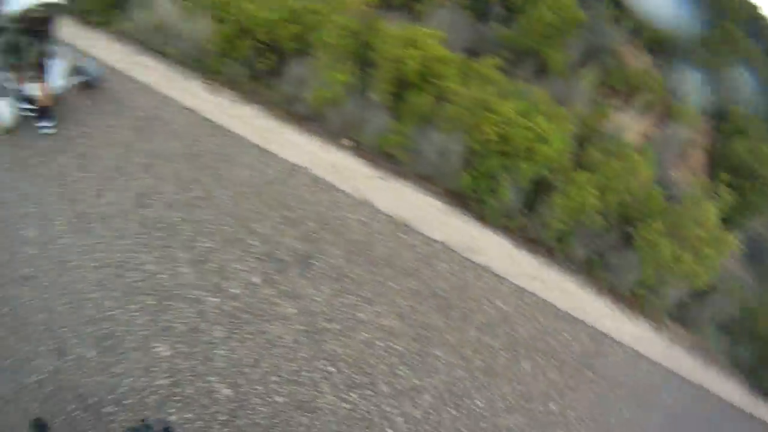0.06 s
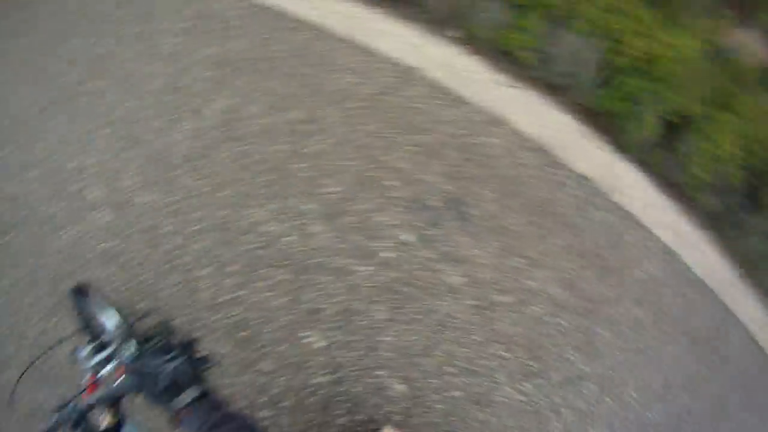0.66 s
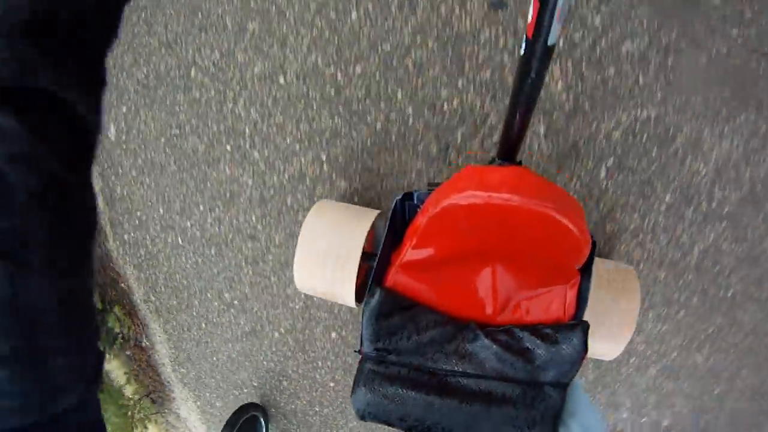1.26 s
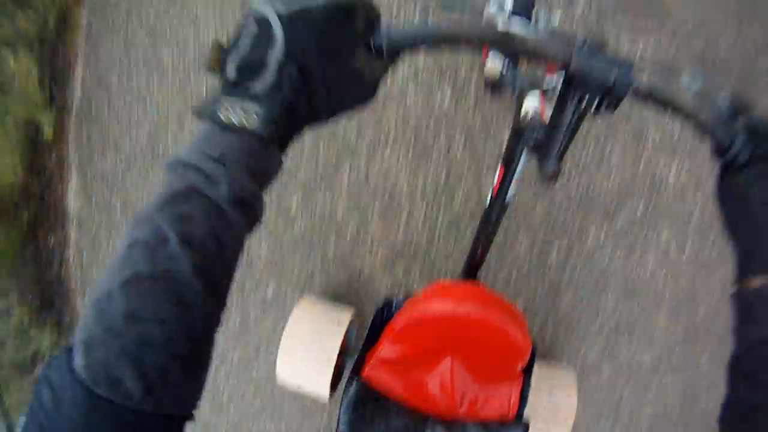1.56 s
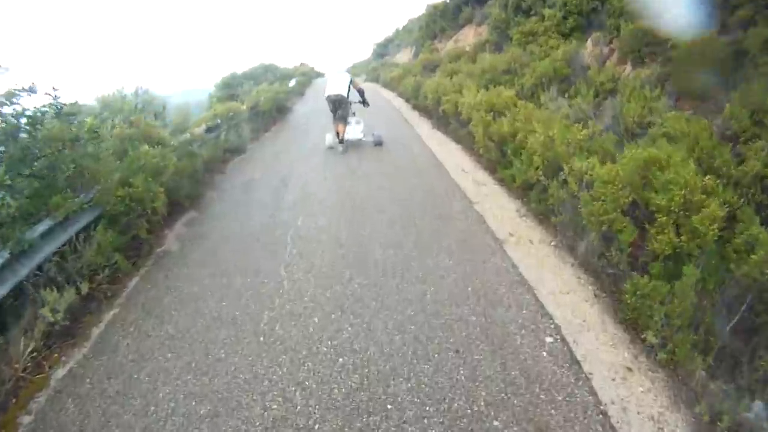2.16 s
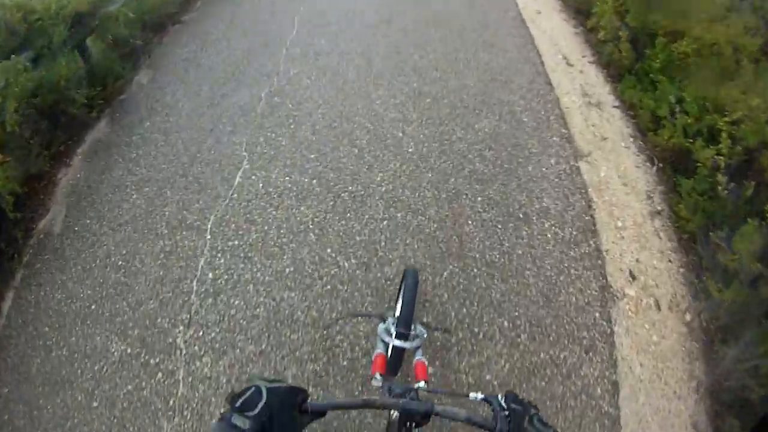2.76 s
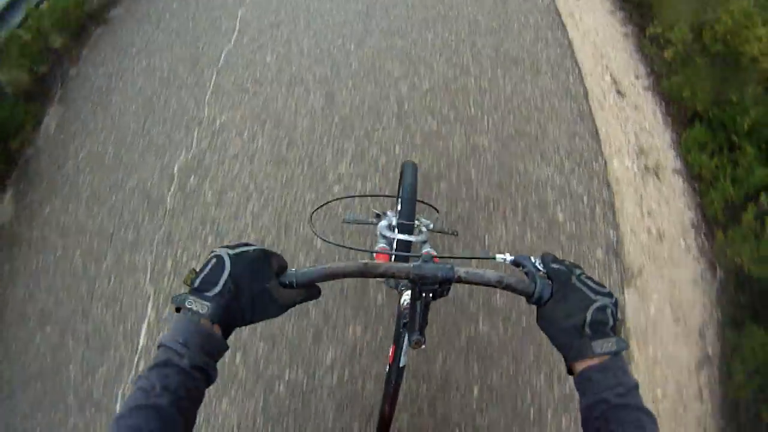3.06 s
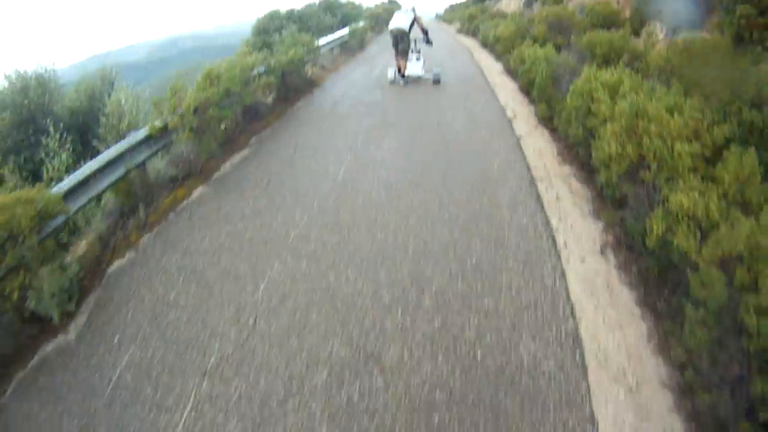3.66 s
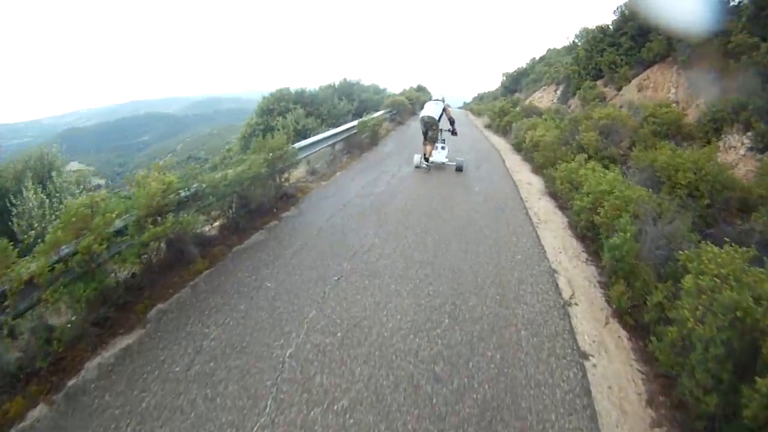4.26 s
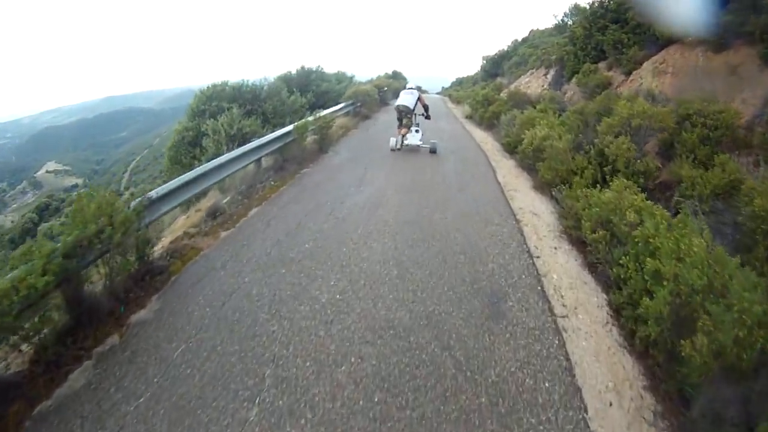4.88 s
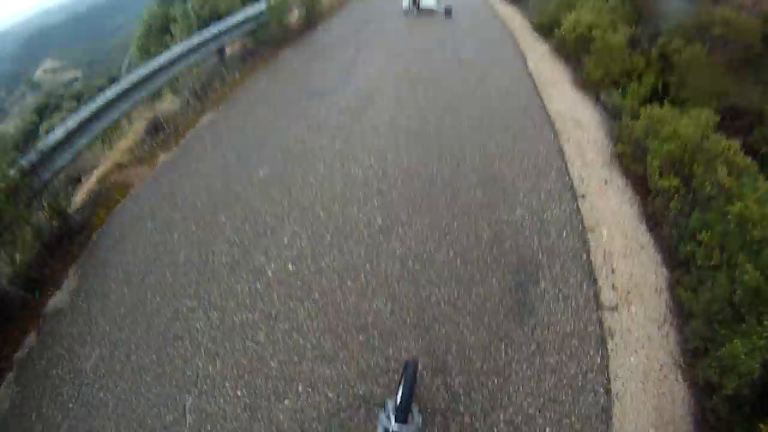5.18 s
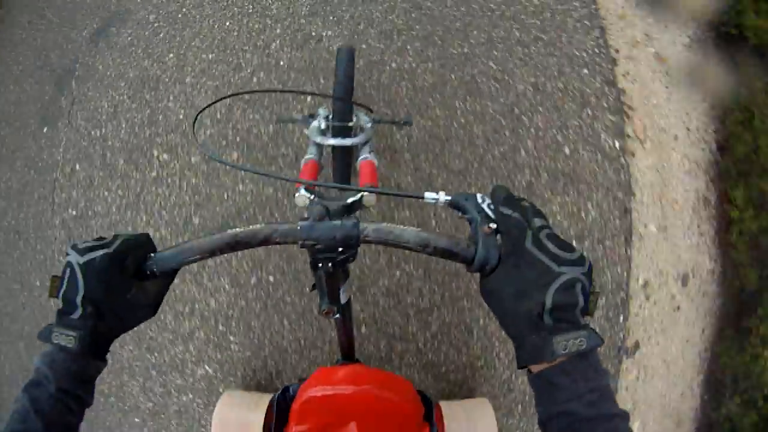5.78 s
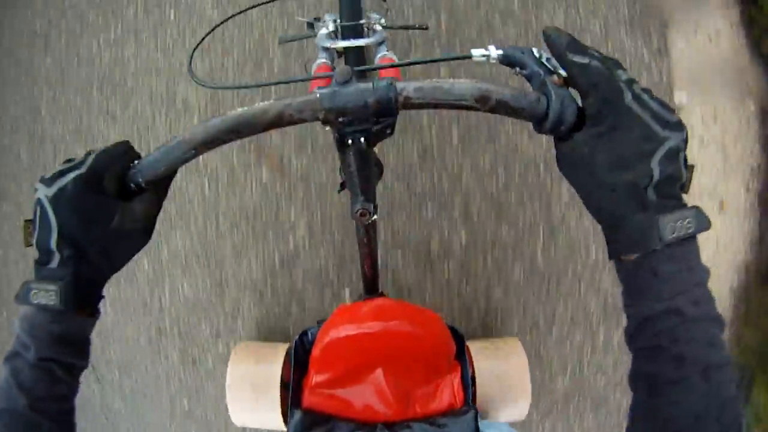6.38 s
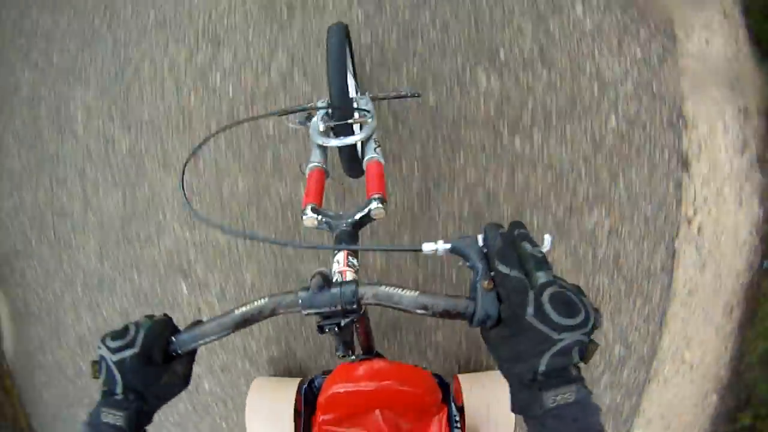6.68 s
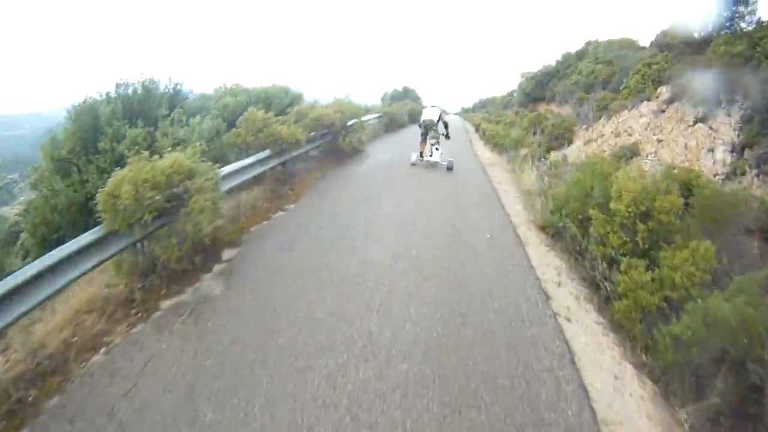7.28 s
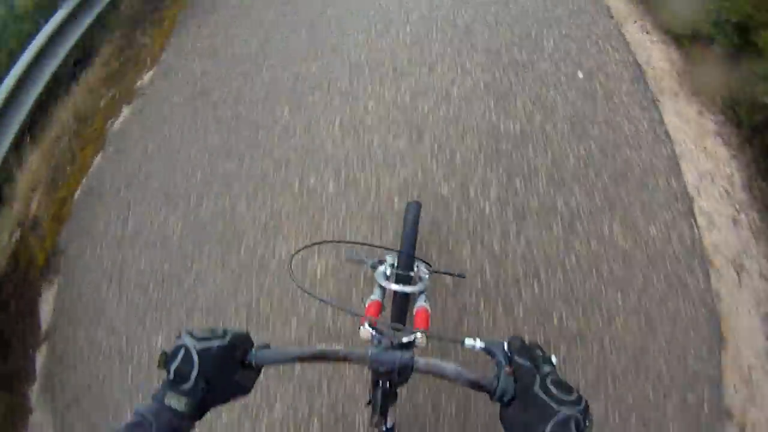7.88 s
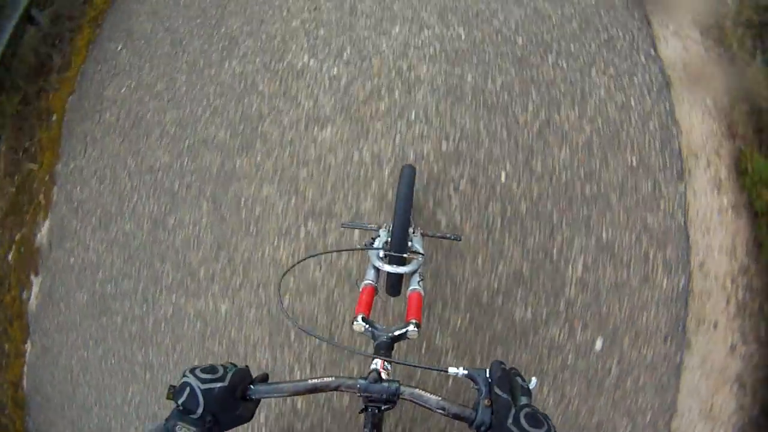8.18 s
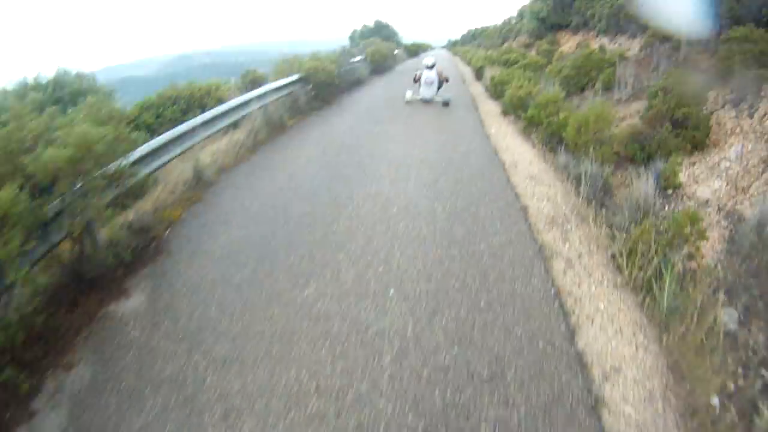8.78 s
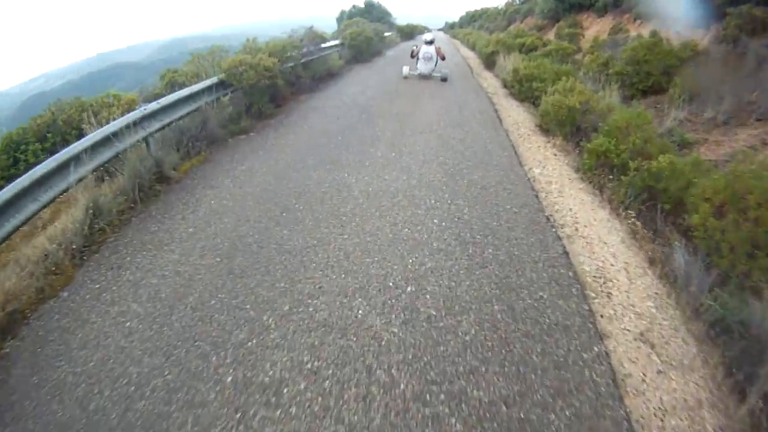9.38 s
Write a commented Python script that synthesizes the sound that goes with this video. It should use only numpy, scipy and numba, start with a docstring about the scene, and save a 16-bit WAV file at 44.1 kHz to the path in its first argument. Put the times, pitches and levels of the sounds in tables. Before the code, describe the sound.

Plastic trike wheels roar over rough asphalt with crackling grit, wind rumble, rattling ticks and a few heavy thumps from bumps.

```python
"""A drift trike rolls down rough asphalt, heard from a camera in a hard case on the rider's helmet.
From the start, plastic wheels roar and grit crackles through the case's resonances; wind rumbles and
the mount ticks. Near 2 s two heavy bumps make the mount boom, and the gain control ducks after each.
The roar swells with speed and changes colour as the head moves, until near 7.8 s the hardest jolt
cracks and overloads the microphone. Throughout, coarse sampling adds a glassy fizz."""
import sys
import numpy as np
from scipy import signal
from scipy.fft import rfft, irfft
from scipy.io import wavfile
from scipy.ndimage import uniform_filter1d
from numba import njit

SR = 44100
rng = np.random.default_rng(int(sys.argv[2]) if len(sys.argv) > 2 else 0)


def output_pcm(signal):
    """Save a mono or channel-first signal as 16-bit PCM at the path in sys.argv[1].

    Samples are clipped to [-1, 1] before scaling.
    """
    pcm = np.clip(np.atleast_2d(signal).T, -1, 1) * 32767
    wavfile.write(sys.argv[1], SR, np.round(pcm).astype(np.int16))


N = 420713
TIME = np.arange(N) / SR
HZ = np.fft.rfftfreq(4096, 1 / SR)

# Wind on the case, patches of loose grit, and the wheels' roar. Each row: time in seconds, level in dB.
WIND_LEVEL = [(0, -50), (.6, -42), (1.0, -49.5), (1.3, -37), (1.55, -50), (1.85, -33), (2.15, -52.5),
              (2.5, -37), (2.8, -53.5), (3.2, -42.5), (3.5, -52.5), (4.0, -44.5), (5.0, -50.5), (5.7, -40),
              (6.15, -53), (6.55, -44), (7.3, -41.5), (7.65, -49.5), (7.92, -36.5), (8.35, -52.5),
              (8.7, -45.5), (9.05, -51.5), (9.54, -47)]
GRIT_LEVEL = [(0, -47), (.2, -50.5), (.6, -45.5), (.8, -48.5), (1.15, -45.5), (2.05, -47), (2.8, -52.5),
              (3.2, -48.5), (4.6, -53), (5.6, -47.5), (6.1, -49), (6.55, -45), (7.25, -52), (7.95, -50),
              (8.6, -58), (9.54, -56.5)]
ROAR_LEVEL = [(0, -44), (.3, -46.5), (.8, -45), (1.45, -41.5), (2.05, -43), (2.8, -45), (3.15, -41.5),
              (5.0, -41), (5.5, -39.5), (6.1, -39.5), (6.75, -37), (7.45, -41), (8.1, -39), (8.65, -40),
              (9.3, -37), (9.54, -40)]
# Unevenness of the wheels' bite. Each row: time in seconds, depth in dB before each layer's scaling.
FLUTTER_DEPTH = [(0, 3.5), (3, 2), (6.8, 3.5), (9.54, 1.6)]
# Spectra of wind, slipping mount, hollow knock, wheel drone and grit.
# Each row: frequency in Hz, relative level in dB.
WIND_SPECTRUM = [(10, -4), (26, 3.5), (52, -3.5), (80, -3), (105, -17.5), (160, -19), (300, -35),
                 (700, -54)]
SCUFF_SPECTRUM = [(60, 3), (190, -1), (300, -6), (500, -10.5), (770, -5), (1150, 2.5), (1400, -3.5),
                  (2100, 6), (2800, -10), (4000, -15.5), (6000, -18)]
KNOCK_SPECTRUM = [(60, -8), (150, 2.5), (230, -6.5), (340, -15.5), (560, -20), (770, -6), (1000, -19),
                  (2000, -32), (5000, -46)]
DRONE_SPECTRUM = [(100, -24.5), (190, -10), (255, 2), (340, -2.5), (450, -2), (600, -7.5), (900, -24),
                  (2000, -50)]
GRIT_SPECTRUM = [(300, -12), (900, -14), (2200, -6.5), (3200, 0.5), (5000, 3.5), (6000, 15)]
# Resonances of the case. Each row: centre in Hz, half-width in Hz, relative gain in dB.
CASE_RESONANCES = [(760, 51, -11.5), (1025, 102, -11.5), (1198, 116, -2.5), (1542, 185, -4.5),
                   (2022, 256, -1), (2247, 190, -1), (2830, 560, -3), (3485, 526, -3.5), (5135, 930, -14.5)]
# Modes rung by the crack. Each row: frequency in Hz, relative level in dB, 60 dB decay time in seconds.
CRACK_MODES = [(980, -19, 0.023), (1122, -12, 0.019), (1240, -13.5, 0.018), (1594, -9, 0.015),
               (1992, 2.5, 0.012), (2340, -5.5, 0.014), (2910, -9, 0.012), (3430, -27, 0.0038),
               (5000, -4, 0.0032)]
# The flexing case wall: frequency in Hz, level against the swing in dB, 60 dB decay time in seconds.
WALL_MODE = (229, -21.5, 0.1)
# Slips of the mount. Each row: start in seconds, length in seconds, level in dB.
SCUFFS = [(.655, 0.091, -39), (1.856, 0.068, -28.5), (2.323, 0.014, -35.5), (2.337, .024, -29)]
# The mount's loudest ticks. Each row: start in seconds, level at the loudest in dB,
# dull part and sharp part in dB against the main note.
TICKS = [(.112, -33.5, -3, -11), (.189, -29.5, -17, -10), (.398, -24, -5, -15), (.541, -30, -29, -22),
         (1.115, -29, -21, -25), (1.343, -29.5, -12, -8), (1.46, -27, -17, -5), (1.476, -27, -20, -8),
         (1.509, -22.5, -27, -6), (1.868, -30, -4, -19), (1.967, -21, 7, -14), (2.049, -28.5, -20, -13),
         (2.08, -28, -28, -11), (2.107, -28.5, -22, -10), (2.146, -27.5, -27, -25), (2.498, -25, -12, -13),
         (2.594, -27, -6, -20), (2.749, -21, -23, -15), (3.194, -26.5, -10, -12), (3.24, -27, -20, -10.5),
         (3.314, -20.5, 10, -9), (4.22, -24, -26, -26), (4.283, -25, -20, -20), (4.392, -26.5, -6, -14),
         (4.681, -29.5, -9, -10), (4.7, -27.5, -3, -20), (4.788, -34.5, -19, -3), (4.87, -19, -28, -21),
         (4.941, -28, -21, -15), (5.295, -26.5, -14, -13), (5.653, -26.5, -7.5, -8.5),
         (5.708, -25, -19, -8), (5.856, -22.5, -26, -18), (6.007, -22, -35, -11), (6.122, -23.5, -22, -11),
         (6.479, -26, -25, -11), (6.633, -32, -16, 2), (6.769, -27, -28, -9), (6.841, -23, -28, -7),
         (6.862, -27, -25, -13), (7.048, -28.5, -22, -9), (7.525, -25.5, -25, -32),
         (7.554, -24.5, -19, -17), (7.901, -24, -18, -11.5), (7.933, -26.5, -4, -18),
         (8.564, -29, -25, -14)]
# Road bumps. Each row: start in seconds, swing level in dB, swing frequency in Hz, knock level in dB.
BUMPS = [(1.222, -24.5, 88, -36.5), (1.715, -27.5, 70.4, -51), (1.856, -24, 65.4, -33),
         (1.895, 1, 64.5, -31), (1.967, -24, 110, -30), (2.323, -24, 70, -29), (2.351, 4.5, 79, -28),
         (3.13, -28, 59.5, -49), (3.311, -31.5, 81, -34), (5.149, -31.5, 78.4, -34.5),
         (5.315, -25, 59, -46), (5.359, -16, 86, -31.5), (5.393, -16.5, 116, -39),
         (5.616, -23.5, 79, -32.5), (6.443, -21, 40.2, -52), (6.475, -19.5, 75.6, -44),
         (7.155, -21.5, 56.4, -47), (7.773, 5, 78.3, -27), (7.932, -16.5, 85, -28.5),
         (8.138, -30.5, 91, -44)]
# The case snapping against its mount: start in seconds, level in dB.
HARDEST_JOLT = (7.7584, 8.5)
# Tilt of the head. Each row: time in seconds, pose from 0 (looking down) to 1 (looking ahead).
HEAD_TILT = [(0, 0), (1.7, 0.1), (1.98, 0.85), (2.25, 0.87), (2.55, 0), (2.9, 0), (3.5, 0.37), (3.85, 0.88),
             (5.15, 1), (5.4, 0.035), (6.98, 0), (7.2, 0.93), (7.6, 1), (7.82, 0.046), (8.62, 0),
             (8.85, 0.97), (9.54, 0.91)]
# Turn of the head. Each row: time in seconds, share of the roadside pose from 0 to 1.
HEAD_TURN = [(0, 0.94), (.58, 0.93), (.85, 0.33)]
# Peaks and dips from helmet and shoulder echoes in each pose.
# Each row: centre in Hz, half-width in Hz, gain in dB.
POSE_AHEAD = [(980, 125, 9), (1250, 140, -2.5), (2180, 180, 4), (2590, 74, 5), (2930, 150, -2.5),
              (3470, 130, -11.5), (3800, 200, 5), (5200, 190, -3)]
POSE_DOWN = [(920, 110, 1), (1230, 71, 1.5), (1740, 150, 1.5), (2120, 71, -4), (2600, 75, -2),
             (2900, 210, 2.5), (3140, 150, 0.5), (4100, 330, -14.5), (4980, 710, 5.5)]
POSE_ASIDE = [(1700, 280, -2.5), (2210, 89, -3), (2430, 95, 6), (2830, 160, -5), (3580, 430, 2.5),
              (4310, 75, 4), (4800, 150, 2.5)]

DRONE_BELOW_ROAR_DB, PEBBLES_BELOW_GRIT_DB = 19.5, 7.5
TICK_HZ, DULL_TICK_HZ = 2230, 1830  # the larger a tick's dull part, the lower its note
CHATTER_RISE_S, CHATTER_T60_S, PING_RISE_S, PING_DB = .001, .019, .0018, -7
RATTLES_PER_S, RATTLE_OVER_GRIT_DB, RATTLE_SPREAD_DB = 4, 14.5, 5.5
SWING_CYCLES = 13.2  # cycles in which a swing dies by 60 dB
LIMIT_DB, FALL_DB_PER_S, HOLD_S, RECOVERY_DB_PER_S = -15.5, 810, .029, 170
CONVERTER_HZ, INPUT_CUTOFF_HZ, OUTPUT_CUTOFF_HZ = 12000, 6050, 15600


def gain_of(db):
    """Amplitude grows tenfold for every 20 dB."""
    return 10 ** (np.asarray(db) / 20)


def unit_rms(x):
    """Normalisation brings the mean power to 1."""
    return x / np.sqrt(np.mean(x ** 2) + 1e-20)


def curve(rows):
    """Linear interpolation gives a timed table's value at every sample."""
    return np.interp(TIME, *np.transpose(rows))


def spectrum(points):
    """Interpolation in dB over log frequency gives a smooth gain curve."""
    hz, db = np.transpose(points)
    return gain_of(np.interp(np.log(HZ + 1), np.log(hz), db))


def resonance(hz, width):
    """A Lorentzian peak falls to half its gain at one width from the centre."""
    return 1 / (1 + ((HZ - hz) / width) ** 2)


def case_response():
    """The resonances of the case add in power."""
    return np.sqrt(sum((gain_of(db) * resonance(hz, width)) ** 2 for hz, width, db in CASE_RESONANCES))


def coloured(x, gain):
    """A minimum-phase filter rings after each click, never before; the result has rms 1."""
    log_gain = np.log(np.maximum(np.r_[gain, gain[-2:0:-1]], 1e-5))
    response = np.exp(np.conj(signal.hilbert(log_gain)))
    taps = irfft(response[:len(gain)])
    return unit_rms(signal.oaconvolve(x, taps)[:len(x)])


def wander(low_hz, high_hz):
    """Band-limited noise of rms 1 fluctuates between two rates."""
    hz = np.fft.rfftfreq(N, 1 / SR)
    band = hz / (hz + low_hz) / (1 + (hz / high_hz) ** 2)
    return unit_rms(irfft(rfft(rng.standard_normal(N)) * band, N))


def grains(per_s, spread_db):
    """Shot noise: independent impacts, mostly small and a few large."""
    size = gain_of(spread_db * np.minimum(rng.exponential(1, N), 4.5))
    return size * rng.choice([-1, 1], N) * (rng.random(N) < per_s / SR)


def add(mix, start_s, sound):
    """Superposition: a sound adds to the mix from its start time."""
    part = mix[round(start_s * SR):][:len(sound)]
    part += sound[:len(part)]


def wind():
    """Turbulence: eddies press unevenly on the case and make it rumble."""
    eddies = rng.standard_normal(N) * gain_of(3.2 * wander(low_hz=2.8, high_hz=15))
    return coloured(eddies, spectrum(WIND_SPECTRUM)) * gain_of(curve(WIND_LEVEL))


def pebbles():
    """Free vibration: each stone flicked off the wheels pings briefly at its own pitch."""
    t = np.arange(512) / SR
    pings = np.zeros(N)
    for when, pitch, size in rng.random((450, 3)):
        ring = np.sin(2 * np.pi * (2400 + 3000 * pitch) * t) * gain_of(-60 * t / .013)
        add(pings, when * N / SR, ring * gain_of(9.6 * size ** 3 - 6 * pitch))
    return unit_rms(pings) * gain_of(curve(GRIT_LEVEL) - PEBBLES_BELOW_GRIT_DB)


def scuff(length_s, db):
    """Stick-slip friction: plastic catches on plastic and lets go."""
    slips = grains(per_s=1500, spread_db=2.5)[:SR // 4]
    rub = coloured(slips, spectrum(SCUFF_SPECTRUM))[:round(length_s * SR)]
    return gain_of(db) * unit_rms(rub * signal.windows.tukey(len(rub), .4))


def tick(db, dull_db, sharp_db):
    """Impact excitation: a blow and its chatter ring the case in a note, a ping, a body and an edge."""
    t = np.arange(4096) / SR
    envelope = (1 - np.exp(-t / CHATTER_RISE_S)) * gain_of(-60 * t / CHATTER_T60_S)
    chatter = unit_rms(rng.standard_normal(len(t)) * envelope)
    blow = unit_rms(signal.unit_impulse(len(t))) + 2.3 * chatter
    note_hz = np.interp(gain_of(dull_db), [0, 1], [TICK_HZ, DULL_TICK_HZ])
    ping_hz = note_hz * rng.uniform(.94, 1.04)
    ping = t * np.exp(-t / PING_RISE_S) * np.sin(2 * np.pi * ping_hz * t)
    case = case_response()
    sound = coloured(blow, case * resonance(note_hz, 820))
    sound += gain_of(PING_DB) * unit_rms(ping)
    sound += gain_of(dull_db) * coloured(blow, case * resonance(820, 380))
    sound += gain_of(sharp_db) * coloured(blow, case * resonance(5380, 830))
    loudest_rms = np.sqrt(uniform_filter1d(sound ** 2, size=128).max())
    return gain_of(db) * sound / loudest_rms


def rattles():
    """Random excitation: the mount ticks lightly, harder where the road is gritty."""
    out, grit_db = np.zeros(N), curve(GRIT_LEVEL)
    for when, size in rng.random((round(RATTLES_PER_S * N / SR), 2)):
        db = grit_db[int(when * N)] + RATTLE_OVER_GRIT_DB + RATTLE_SPREAD_DB * (2 * size - 1)
        add(out, when * N / SR, tick(db, dull_db=-22, sharp_db=-8.5))
    return out


def boom(db, hz, knock_db):
    """Damped oscillation: a bump swings the camera on its mount, flexes the wall and knocks the case."""
    t = np.arange(SR // 2) / SR
    wall_hz, wall_db, wall_t60 = WALL_MODE
    swing_envelope = (1 - np.exp(-(t / .0043) ** 2.4)) * gain_of(-60 * t * hz / SWING_CYCLES)
    swing = swing_envelope * np.sin(2 * np.pi * hz * t)
    flex_envelope = (1 - np.exp(-t / .0048)) * gain_of(wall_db - 60 * t / wall_t60)
    flex = flex_envelope * np.sin(2 * np.pi * wall_hz * t)
    knock = coloured(rng.standard_normal(len(t)), spectrum(KNOCK_SPECTRUM))
    knock *= gain_of(knock_db - 60 * t / .086)
    return gain_of(db) * (swing - flex) + knock  # the wall bends against the shove


def crack(db):
    """Impulse response: a hard snap sets all modes of the case ringing at once."""
    t = np.arange(4096) / SR
    return sum(gain_of(db + mode_db - 60 * t / t60) * np.sin(2 * np.pi * hz * t)
               for hz, mode_db, t60 in CRACK_MODES)


def posed(x, gain, pose):
    """Interference: the echoes of one head pose put peaks and dips on the gain that filters x."""
    echo_db = sum(db * np.exp(-((HZ - hz) / width) ** 2) for hz, width, db in pose)
    return coloured(x, gain * gain_of(echo_db))


def past_helmet(x, gain):
    """Directional filtering: the colour of the wheels fades from pose to pose as the head moves."""
    ahead, aside = curve(HEAD_TILT), curve(HEAD_TURN)
    forward = ahead * posed(x, gain, POSE_AHEAD) + (1 - ahead) * posed(x, gain, POSE_DOWN)
    return unit_rms((1 - aside) * forward + aside * posed(x, gain, POSE_ASIDE))


def wheels():
    """Rolling noise: countless stones strike the wheels, the contact flutters, and grit crackles."""
    bite_db = curve(FLUTTER_DEPTH) * wander(low_hz=.7, high_hz=44)
    stone_hits = grains(per_s=9000, spread_db=2) * gain_of(.66 * bite_db)
    roar = past_helmet(stone_hits, case_response() * spectrum([(2300, 5.5), (3200, -7), (5000, -2)]))
    grit_hits = grains(per_s=2200, spread_db=4.5)
    grit_hits *= gain_of(1.33 * bite_db + 3 * wander(low_hz=1.2, high_hz=29.8))
    grit = past_helmet(grit_hits, case_response() * spectrum(GRIT_SPECTRUM))
    drone = coloured(rng.standard_normal(N) * gain_of(.5 * bite_db), spectrum(DRONE_SPECTRUM))
    rolling = roar + drone * gain_of(-DRONE_BELOW_ROAR_DB)
    return rolling * gain_of(curve(ROAR_LEVEL)) + grit * gain_of(curve(GRIT_LEVEL))


def scene():
    """Superposition: all sources add at one microphone inside the case."""
    mix = wheels() + pebbles() + wind()
    for events, source in (TICKS, tick), (BUMPS, boom), (SCUFFS, scuff), ([HARDEST_JOLT], crack):
        for start_s, *settings in events:
            add(mix, start_s, source(*settings))
    mix += rattles()
    return np.array([mix, mix])


@njit
def gain_control(x, limit, fall_db_per_s, hold_s, recovery_db_per_s):
    """Negative feedback: the gain falls while the output is over the limit, holds, then recovers."""
    out, cut_db, last_over = np.zeros(len(x)), 0., 0
    for i in range(len(x)):
        out[i] = x[i] * 10 ** (-cut_db / 20)
        if abs(out[i]) > limit:
            cut_db, last_over = cut_db + fall_db_per_s / SR, i
        elif i - last_over > hold_s * SR:
            cut_db = max(cut_db - recovery_db_per_s / SR, 0.)
    return out


def record(dry):
    """Spectral imaging: holding each sample mirrors the ducked, clipped sound into the treble."""
    ducked = gain_control(dry.mean(0), gain_of(LIMIT_DB), FALL_DB_PER_S, HOLD_S, RECOVERY_DB_PER_S)
    overloaded = np.clip(ducked, -1, 1)
    narrow = signal.oaconvolve(overloaded, signal.firwin(161, INPUT_CUTOFF_HZ, fs=SR), "same")
    samples = np.clip(signal.resample_poly(narrow, CONVERTER_HZ, SR), -.97, .97)
    held = signal.resample_poly(np.repeat(samples, 4), SR, 4 * CONVERTER_HZ)[:N]
    lowpass = signal.firwin(255, OUTPUT_CUTOFF_HZ, window=("kaiser", 8), fs=SR)
    out = signal.oaconvolve(held, lowpass, "same")
    return np.array([out, out])


dry = scene()
out = record(dry)
output_pcm(out)
```